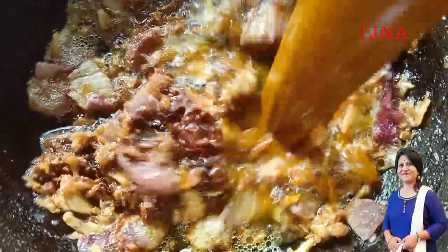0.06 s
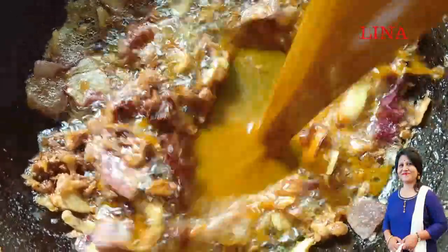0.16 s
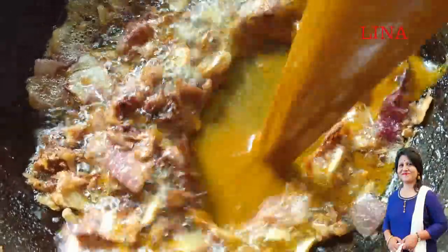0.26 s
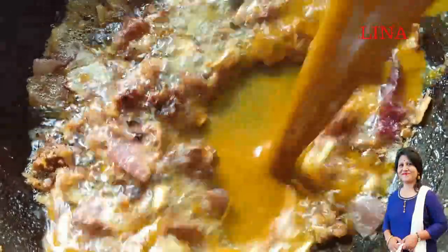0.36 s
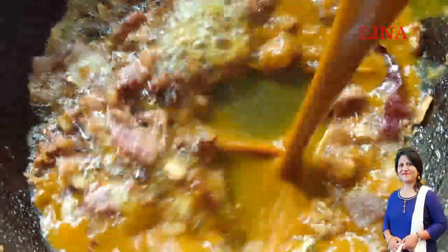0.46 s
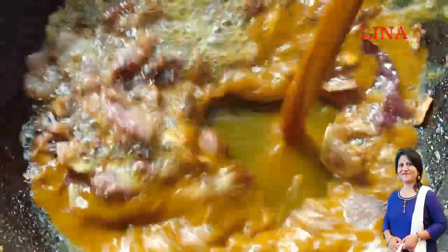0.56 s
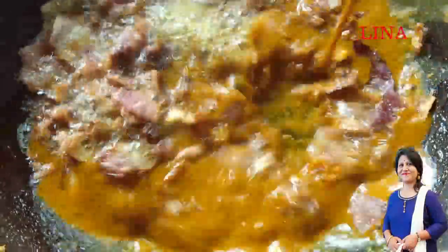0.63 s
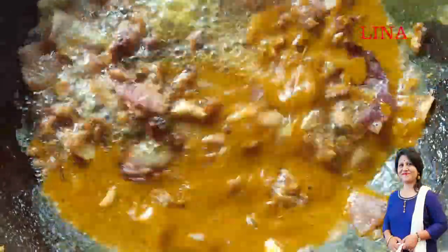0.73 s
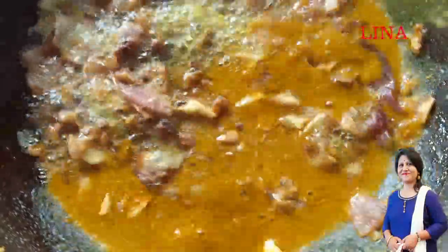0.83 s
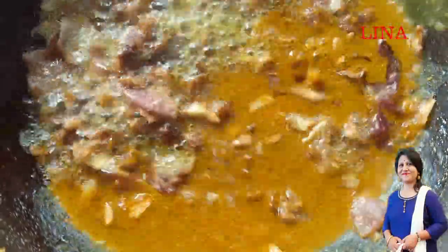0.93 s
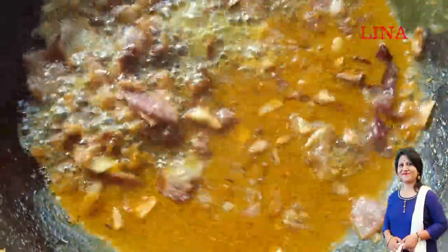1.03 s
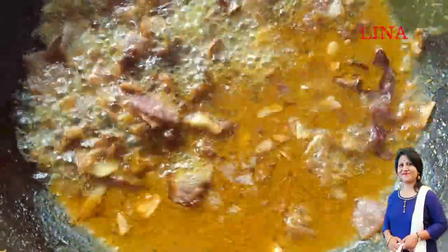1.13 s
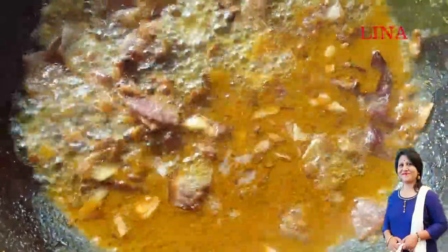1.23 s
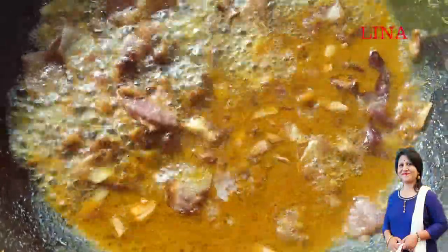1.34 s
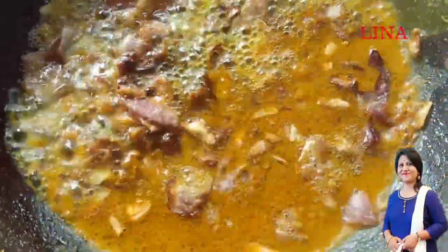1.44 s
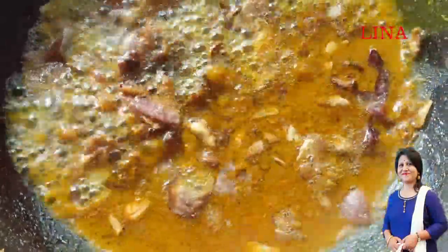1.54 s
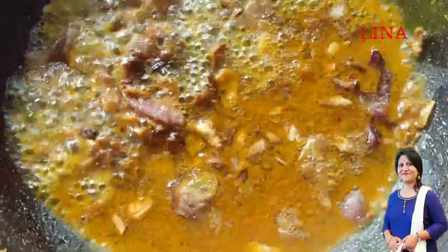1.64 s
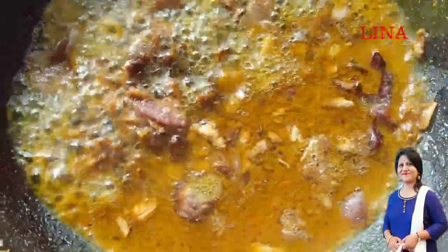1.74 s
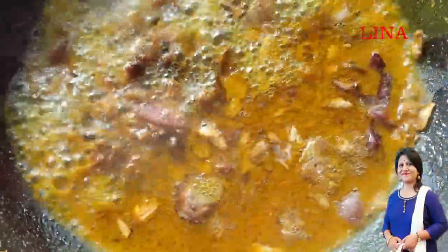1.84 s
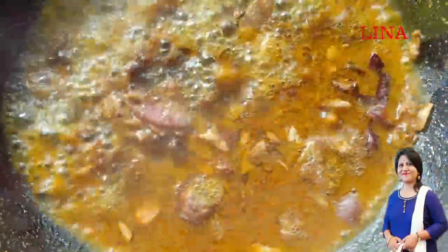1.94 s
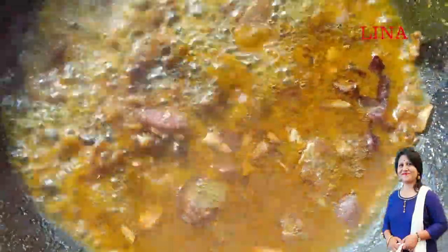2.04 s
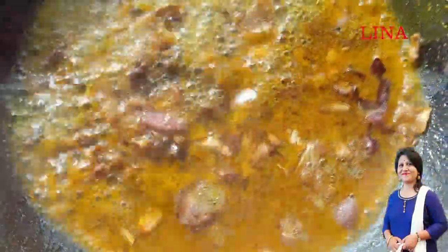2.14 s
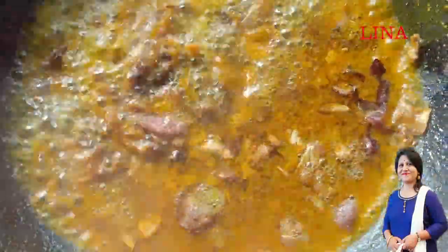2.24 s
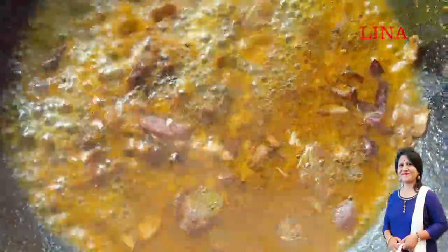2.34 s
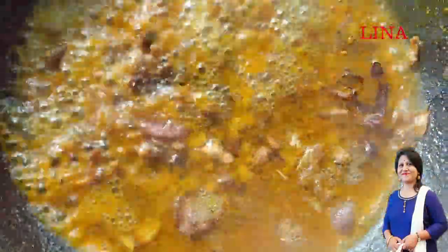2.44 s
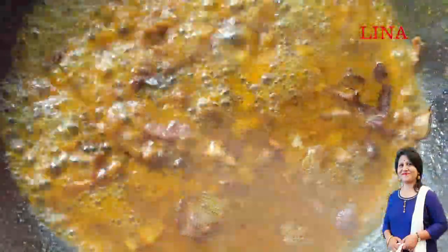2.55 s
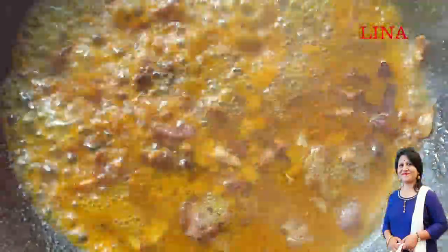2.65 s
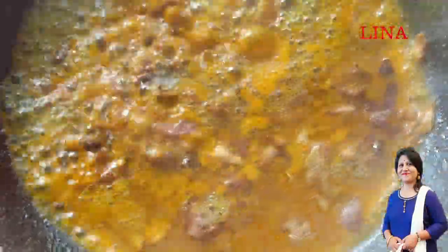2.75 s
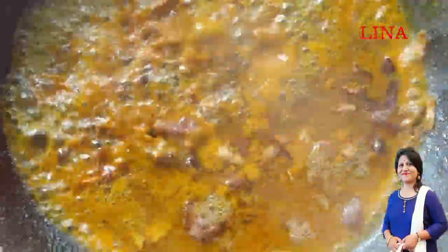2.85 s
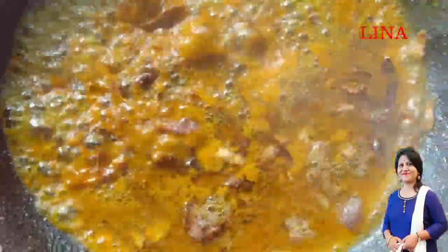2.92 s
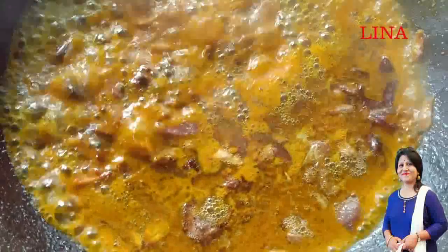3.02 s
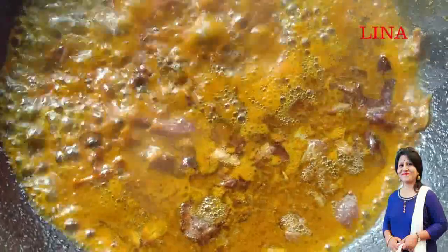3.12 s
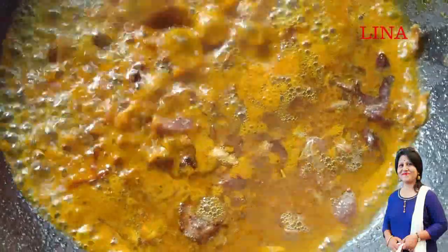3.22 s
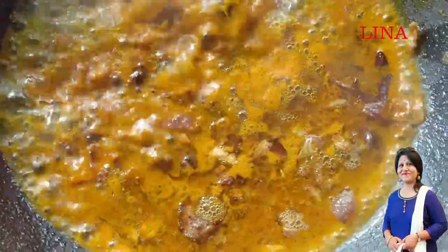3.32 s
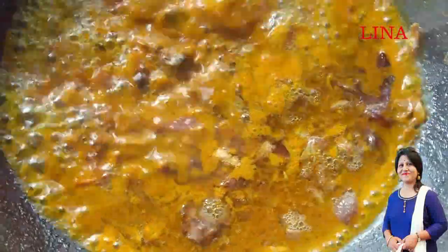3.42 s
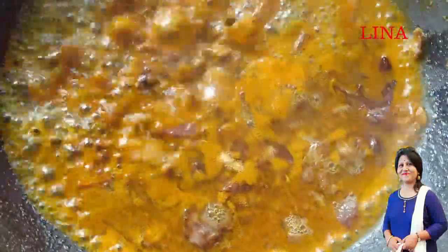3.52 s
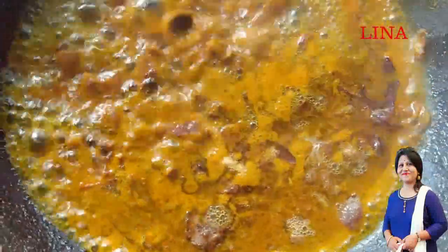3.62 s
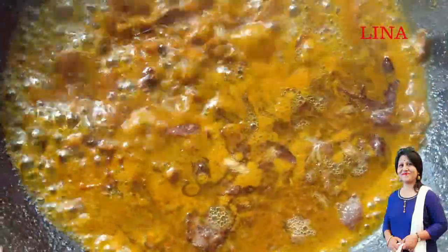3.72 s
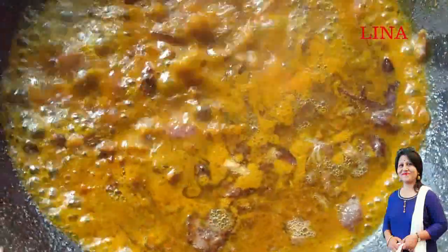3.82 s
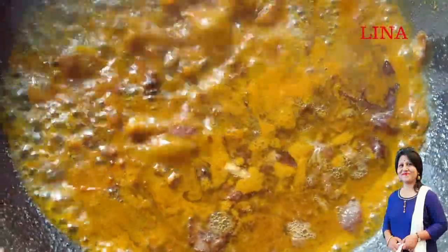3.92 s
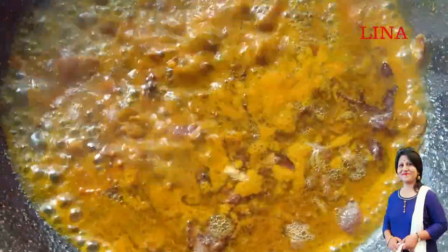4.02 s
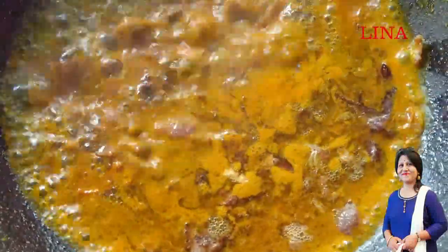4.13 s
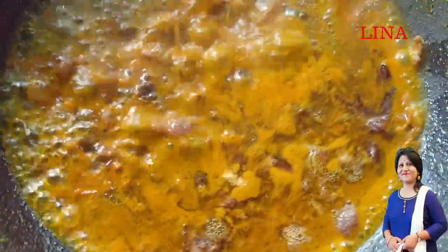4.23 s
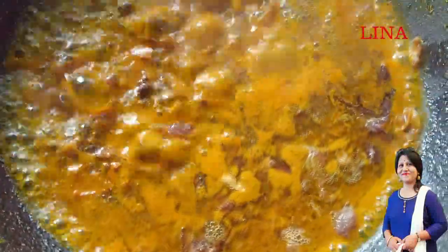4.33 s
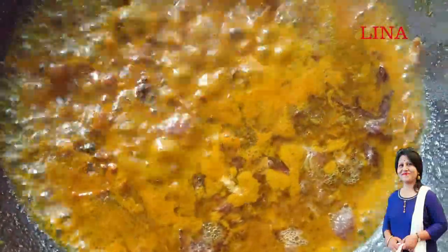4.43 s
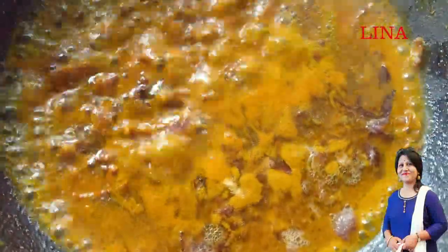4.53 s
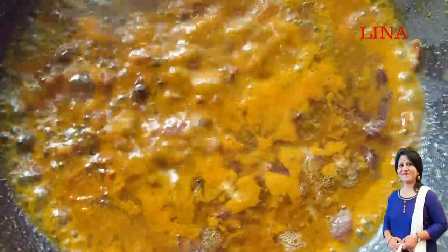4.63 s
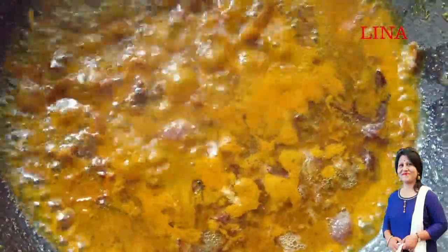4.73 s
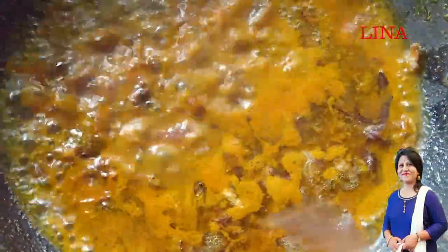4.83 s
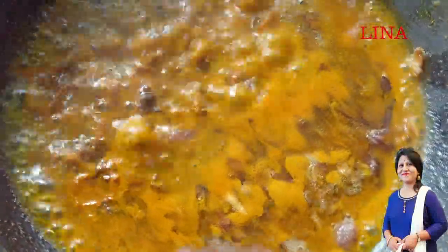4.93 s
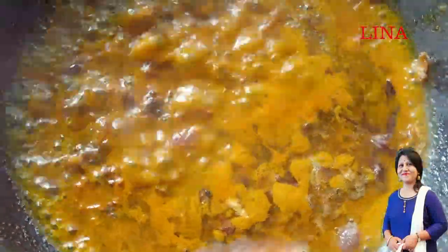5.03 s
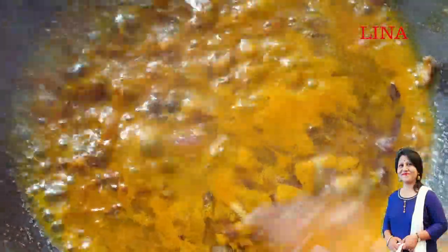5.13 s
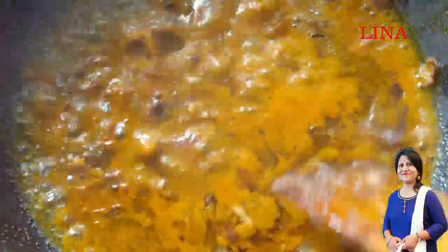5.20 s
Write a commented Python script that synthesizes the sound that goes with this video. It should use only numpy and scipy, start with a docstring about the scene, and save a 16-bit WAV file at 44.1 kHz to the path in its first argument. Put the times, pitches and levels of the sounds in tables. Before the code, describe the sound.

Watery spice paste is poured into a pan of hot oil and at once hisses loudly, with drops spitting and pinging. The sizzle slowly thins out while small bubbles simmer beneath it, sinking in pitch. Later a low burble grows and a few thick pockets of steam plop through the paste. The microphone is close to the pan, and an appliance hums faintly in the kitchen behind it.

```python
"""A kitchen, with the microphone close to a pan of hot oil as watery spice paste is poured in.
The water boils off in thousands of tiny steam bursts that hiss loudly, then thin out as the oil cools.
A few drops spit and ping. Under the hiss, small bubbles simmer lower and lower in pitch,
and thick pockets of steam plop through the paste. An appliance hums in the background."""
import sys
import numpy as np
from scipy import signal
from scipy.fft import rfft, irfft
from scipy.io import wavfile

SR = 44100
rng = np.random.default_rng(int(sys.argv[2]) if len(sys.argv) > 2 else 0)


def store_pcm(level_fs):
    """Save levels as 16-bit WAV."""
    pcm = np.round(np.clip(level_fs, -1, 1) * 32767).astype(np.int16)
    wavfile.write(sys.argv[1], SR, np.atleast_2d(pcm).T)


N = 232230
TIME = np.arange(N) / SR

# The appliance in the background. Each row: pitch in Hz, rms level in dB before the swell.
HUM_LINES = [(100, -54), (199, -58.5), (248, -54), (350, -57.5), (499, -48)]
# The hum dips, then swells. Each row: time in seconds, gain in dB.
HUM_SWELL = [(0, 0), (1.3, -10), (2.45, 2), (2.8, 3.5), (5.27, 7)]
# Big steam pockets. Each row: start in seconds, level in dB, pitch in Hz, seconds to fall 60 dB.
PLOPS = [(2.91, -36, 88, 0.13), (3.085, -27.5, 156, 0.15), (3.935, -25.5, 179, 0.11),
         (4.883, -11, 435, .03), (4.888, -25, 347, 0.25)]
# Chains of bubbles. Each row: start and length in seconds, opening level in dB, middle pitch in Hz.
GURGLES = [(1.628, .1, -19, 640), (4.905, .11, -16.5, 472)]
# Droplets that ping above the hiss. Each row: start in seconds, level in dB, pitch in Hz.
PINGS = [(0.075, -4, 5740), (0.694, -7, 5950), (1.846, -9, 5800), (4.777, -19, 4970)]
# Drops that spit. Each row: start in seconds, level in dB.
SPITS = [(0.067, -1), (0.185, -8.5), (0.493, -6), (0.51, -2), (0.556, -6), (0.7136, -3), (0.8919, -8),
         (1.0336, -7), (1.666, -5), (1.745, -8), (1.8924, -4.5), (3.0841, 1.5), (3.3641, -7)]
# The ring of a spit. Each row: pitch in Hz, relative level in dB, seconds to fall 60 dB.
SPIT_MODES = [(2432, 0.5, 0.019), (2690, 6, 0.0092), (1868, -27, 0.24), (6070, -17, 0.0045),
              (7400, -32, 0.0039)]
# Spectra of the deep burble and the four frying layers. Each row: frequency in Hz, relative level in dB.
BURBLE_COLOUR = [(20, -35), (45, -8), (80, -7.5), (140, 3), (250, 6.5), (340, 7.5), (480, -27), (700, 4.5),
                 (2000, -37)]
SIZZLE_COLOUR = [(40, -66), (200, -35), (500, -27.5), (1150, -15.5), (1400, -14.5), (1850, -14),
                 (2200, -4.5), (2420, 1.5), (2620, -1), (2900, -11), (3300, -22.5), (3900, -26.5),
                 (6000, -44), (10000, -51.5)]
SPUTTER_COLOUR = [(100, -72), (2500, -14), (3800, -7.5), (4300, -4.5), (4950, 1.5), (5450, -1.5),
                  (6050, 1.5), (6700, -8), (7200, -9.5), (7800, -15), (8800, -17), (9800, -22.5),
                  (16000, -44)]
FIZZ_COLOUR = [(5000, -35), (9000, -11), (10000, -10), (10400, -7.5), (10900, -8.5), (11400, -4.5),
               (12100, -7.5), (12900, -6), (13600, .5), (14500, -2), (15500, 0)]
SPLASH_COLOUR = [(100, -59), (400, -14.5), (900, -26), (1400, -13), (1850, -13), (2300, 10), (2650, 15),
                 (2950, 4), (3250, 3.5), (4200, -7.5), (5400, -8.5), (6100, 0), (7300, -11.5), (16000, -60)]
# Hollows in the hiss. Each row: centre and width in Hz, share missing at first, filling time in seconds.
HOLLOWS = [(1170, 370, 0.72, 1.27), (4390, 1080, 0.24, 2.6)]
# How fiercely the water boils off. Each row: time in seconds, level in dB.
BOIL = [(0.0, -18.5), (0.07, -11), (0.55, -12.0), (0.95, -16), (1.45, -15.5), (1.83, -13), (2.1, -15.5),
        (2.85, -17), (3.12, -16), (3.5, -16), (3.6, -18), (3.97, -17.5), (4.1, -19.5), (4.75, -22),
        (5.0, -23), (5.27, -24)]
# Flare-ups as paste slides onto hotter oil. Each row: middle and half-length in seconds, boost in dB.
FLARES = [(3.135, 0.013, 4.5), (3.377, 0.019, 1.5), (4.278, 0.027, 1.5), (4.554, 0.022, 2.5),
          (4.774, .03, 1.5)]
# How the layers follow the boil. Each row: level at full boil in fresh oil in dB, dB per dB of boil,
# change in dB per second as the oil cools, extra dB during the pour.
BUBBLES = (-25.5, 0.36, -0.5, -0.5)
SIZZLE = (-11.5, 0.8161, -0.1, 0)
SPUTTER = (-22, 0.5, -0.54, 0.5)
FIZZ = (-28.5, 0.29, -2, 2)
SPLASH = (-15, 0.6, -6, 3.5)


def gain_of(db):
    """Decibels to amplitude."""
    return 10 ** (np.asarray(db) / 20)


def unit_rms(x):
    """Scales to rms 1."""
    return x / np.sqrt(np.mean(x ** 2) + 1e-20)


def curve(rows):
    """Reads a time table at every sample."""
    return np.interp(TIME, *np.transpose(rows))


def add(mix, start_s, sound):
    """Mixes a sound in at its start time."""
    part = mix[max(round(start_s * SR), 0):][:len(sound)]
    part += sound[:len(part)]


def coloured(x, colour, size=4096):
    """Causal filter with the given spectrum, so that each click rings after it lands."""
    hz, db = np.transpose(colour)
    bin_hz = abs(np.fft.fftfreq(size, 1 / SR))
    log_gain = np.log(gain_of(np.interp(np.log(bin_hz + 1), np.log(hz), db)))
    ring = np.fft.ifft(np.exp(np.conj(signal.hilbert(log_gain)))).real  # minimum phase
    return signal.oaconvolve(x, ring[:size // 2])[:len(x)]


def wander(slow_hz, fast_hz):
    """Random drift of rms 1 with about equal power in each octave between two rates."""
    hz = np.fft.rfftfreq(N, 1 / SR)
    shape = hz / (hz ** 2 + slow_hz ** 2) ** (3 / 4) / (1 + (hz / fast_hz) ** 4)
    return unit_rms(irfft(rfft(rng.standard_normal(N)) * shape, N))


def appliance_hum(waver_db=2.2, drift_turns=0.11):
    """Faint low tones behind the pan, each wavering in level and phase."""
    out = np.zeros(N)
    for hz, db in HUM_LINES:
        level = gain_of(db + waver_db * wander(0.43, 10))
        turns = hz * TIME + drift_turns * wander(0.54, 5.7)
        out += level * np.sin(2 * np.pi * turns)
    return np.sqrt(2) * out * gain_of(curve(HUM_SWELL))


def boil_gain(layer, full_boil_db=-10.5, pour_rise_s=0.062, pour_until_s=0.47, trail_s=0.3):
    """A layer rises and falls with the boil, changes during the pour and fades as the oil cools."""
    full_db, response, cooling_db_per_s, pour_db = layer
    flares_db = sum(db * np.exp(-((TIME - middle_s) / half_s) ** 2) for middle_s, half_s, db in FLARES)
    boil_db = curve(BOIL) - full_boil_db + flares_db
    pouring = np.clip(np.minimum(TIME / pour_rise_s, 1 - (TIME - pour_until_s) / trail_s), 0, 1)
    return gain_of(full_db + response * boil_db + cooling_db_per_s * TIME + pour_db * pouring)


def burble(landing_db=-39, hold_s=0.1, t60=0.83, warm_db=-39.5, cold_db=-16.5, warming_s=1.1):
    """Thick paste lands with a soft thud, lies quiet while cold, then burbles as it warms through."""
    landing = gain_of(landing_db - 60 * np.maximum(TIME - hold_s, 0) / t60)
    warming = gain_of(warm_db + cold_db * np.exp(-TIME / warming_s))
    return unit_rms(coloured(rng.standard_normal(N), BURBLE_COLOUR)) * np.hypot(landing, warming)


def simmer(count=9000, first_hz=849.4, sag_hz_per_s=52.3, spread_octaves=0.35, cycles=7.7, rise=0.026):
    """Each small bubble rings briefly, gliding up; as the paste heats they grow and start lower."""
    out = np.zeros(N)
    middle_hz = first_hz - sag_hz_per_s * TIME
    starts = rng.integers(0, N, count)
    for at, octaves, strength in zip(starts, rng.standard_normal(count), rng.exponential(1, count)):
        hz = middle_hz[at] * 2 ** (spread_octaves * octaves)
        age = np.arange(1500) * hz / SR / cycles  # in decay times
        ring = np.sin(2 * np.pi * cycles * age * (1 + rise * age)) * np.exp(-age)
        add(out, at / SR, ring * gain_of(0.46 * min(strength, 4)) * (-1) ** at)
    # bubbles this small radiate almost no bass
    bubbles = signal.sosfilt(signal.butter(3, 380, "high", fs=SR, output="sos"), out)
    pooled = np.clip((TIME - 0.1) / 0.044, 0, 1)  # 3 dB quieter until the paste has pooled
    return unit_rms(bubbles) * boil_gain(BUBBLES) * gain_of(-3 * (1 - pooled))


def plop(db, hz, t60, swell_cycles=0.48):
    """A pocket in the paste rings at one low pitch as it opens."""
    t = np.arange(SR // 2) / SR
    swell = 1 - np.exp(-hz * t / swell_cycles)
    return gain_of(db - 60 * t / t60) * np.sin(2 * np.pi * hz * t) * swell


def steam_pockets(per_chain=8, spread_octaves=0.22, fade_db=-7):
    """Big pockets plop singly; smaller ones gurgle up in quick, uneven, fading chains."""
    out = np.zeros(N)
    for start_s, db, hz, t60 in PLOPS:
        add(out, start_s, plop(db, hz, t60))
    for start_s, length_s, db, hz in GURGLES:
        places = (np.arange(per_chain) + rng.random(per_chain)) / per_chain
        for place, octaves in zip(places, rng.normal(0, spread_octaves, per_chain)):
            add(out, start_s + length_s * place, plop(db + fade_db * place, hz * 2 ** octaves, t60=0.065))
    return out


def ping(hz, decay_cycles=9):
    """A tiny bubble rings for a few cycles."""
    turns = np.arange(1024) * hz / SR
    return np.sin(2 * np.pi * turns) * np.exp(-turns / decay_cycles) * (1 - np.exp(-turns))


def droplets():
    """A few droplets ping singly above the hiss."""
    out = np.zeros(N)
    for start_s, db, hz in PINGS:
        add(out, start_s, gain_of(db) * ping(hz))
    return out


def spits(swell_s=0.0017, detune=0.0107, crack_gain=0.33, crack_s=0.0023):
    """A drop flashes to steam: a tiny crack, then a tick that swells over a few cycles and dies fast."""
    out, t = np.zeros(N), np.arange(SR // 5) / SR
    for start_s, db in SPITS:
        ring = sum(gain_of(mode_db - 60 * t / t60) * np.sin(2 * np.pi * hz * rng.normal(1, detune) * t)
                   for hz, mode_db, t60 in SPIT_MODES)
        tick = ring * (1 - np.exp(-(t / swell_s) ** 2))
        crack = coloured(rng.standard_normal(len(t)) * np.exp(-t / crack_s), SPLASH_COLOUR)
        spit = tick / abs(tick).max() + crack_gain * crack / abs(crack).max()
        add(out, start_s, gain_of(db) * spit)
    return out


def bursts(per_s, spread_db):
    """Steam bursts as random clicks of rms 1; the wider the spread, the more a few stand out."""
    fires = rng.random(N) < per_s / SR
    strength = gain_of(spread_db * np.minimum(rng.exponential(1, N), 5))
    sign = rng.choice([-1, 1], N)
    return unit_rms(sign * strength * fires / np.sqrt(per_s))


def tinkle(low_hz, high_hz, spread_db, per_s=3000, sizes=32):
    """Many tiny bubbles, each size ringing at its own pitch and at its own random moments."""
    out = np.zeros(N)
    for hz in np.linspace(low_hz, high_hz, sizes):
        ring = ping(hz * rng.normal(1, 0.0076))
        out += signal.oaconvolve(bursts(per_s / sizes, spread_db), ring / np.linalg.norm(ring))[:N]
    return unit_rms(out)


def hollowed(x):
    """Notches in the hiss fill in as the paste spreads."""
    for hz, width_hz, share, fill_s in HOLLOWS:
        carrier = np.exp(2j * np.pi * hz * TIME)
        pole = np.exp(-np.pi * width_hz / SR)
        # shift the band to 0 Hz, smooth it, shift it back
        band = 2 * (carrier * signal.lfilter([1 - pole], [1, -pole], x / carrier)).real
        x = x - share * np.exp(-TIME / fill_s) * band
    return x


def frying(first_per_s=16000, last_per_s=6000, flurry_db=0.56):
    """Steam bursts of three sizes thin out as the oil cools; a splash fades early. All share flurries."""
    per_s = np.geomspace(first_per_s, last_per_s, N)
    flurries = gain_of(flurry_db * wander(1.1, 170))
    large = bursts(per_s, spread_db=2.5) + 0.84 * rng.standard_normal(N)  # clicks over smooth steam
    small = bursts(per_s, spread_db=2.5) + 0.5 * rng.standard_normal(N)
    small += 0.37 * tinkle(3590, 8910, spread_db=3)
    finest = bursts(per_s, spread_db=0) + 0.28 * rng.standard_normal(N)
    finest += 0.8 * tinkle(8680, 15800, spread_db=0.5)
    spatter = bursts(per_s=4000, spread_db=4)
    sizzle = unit_rms(coloured(flurries * large, SIZZLE_COLOUR)) * boil_gain(SIZZLE)
    sputter = unit_rms(coloured(flurries * small, SPUTTER_COLOUR)) * boil_gain(SPUTTER)
    fizz = unit_rms(coloured(flurries * finest, FIZZ_COLOUR)) * boil_gain(FIZZ)
    fizz *= gain_of(-4 * np.maximum(1 - TIME / 0.08, 0))  # the fizz needs a moment to get going
    splash = unit_rms(coloured(flurries * spatter, SPLASH_COLOUR)) * boil_gain(SPLASH)
    return sizzle + sputter + fizz + splash


def scene():
    """One microphone, with the pan close up and the appliance behind it."""
    pan = hollowed(frying() + simmer() + burble()) + spits() + droplets() + steam_pockets()
    return (pan + appliance_hum())[None]


def record(dry, edge_hz=15800):
    """The recorder clips the loudest peaks, then cuts the highest treble."""
    clipped = np.clip(dry, -1, 1)
    low_pass = signal.firwin(1023, edge_hz, window=("kaiser", 9), fs=SR)
    return signal.oaconvolve(clipped, low_pass[None], "same")


dry = scene()
out = record(dry)
store_pcm(out)
```